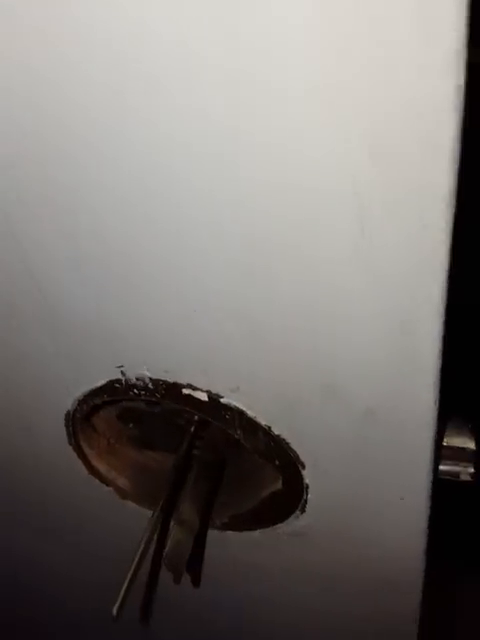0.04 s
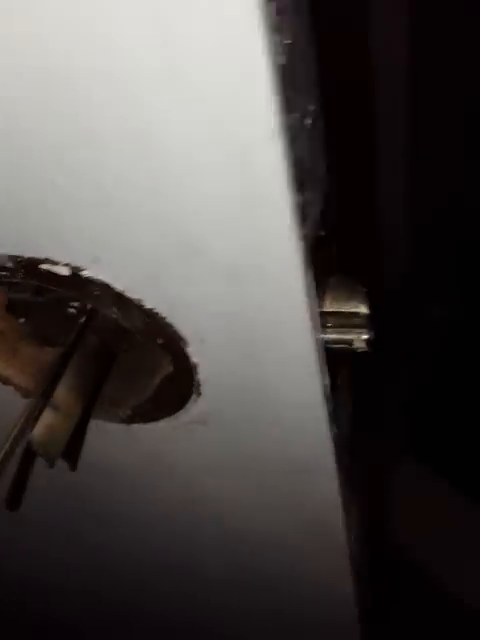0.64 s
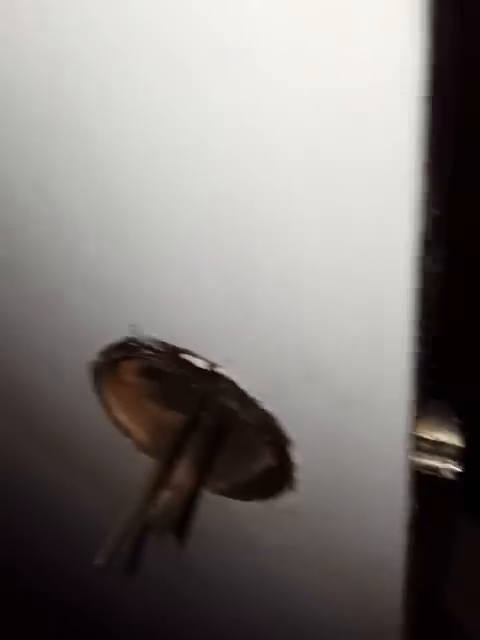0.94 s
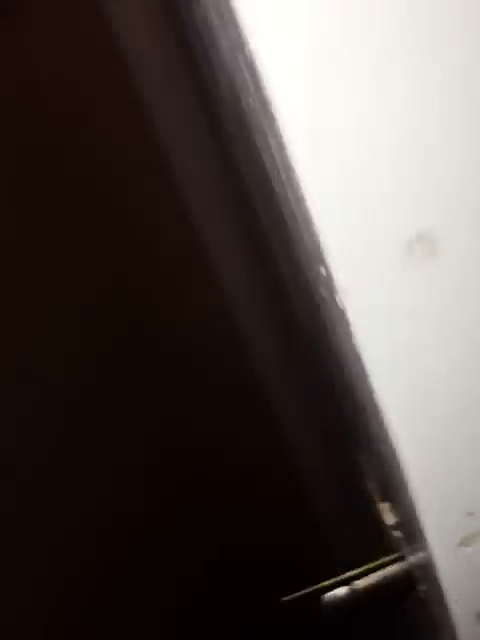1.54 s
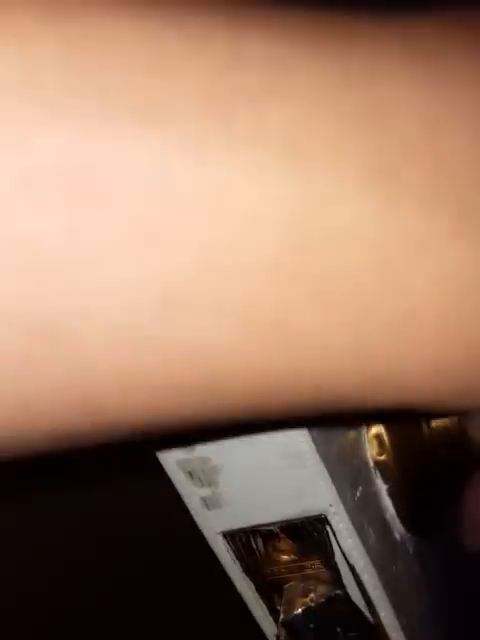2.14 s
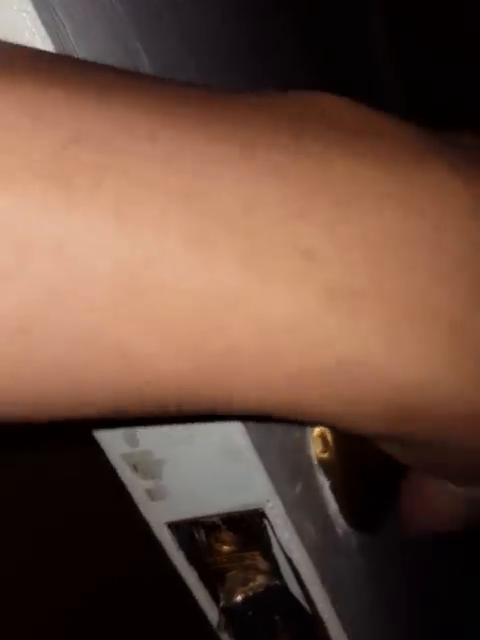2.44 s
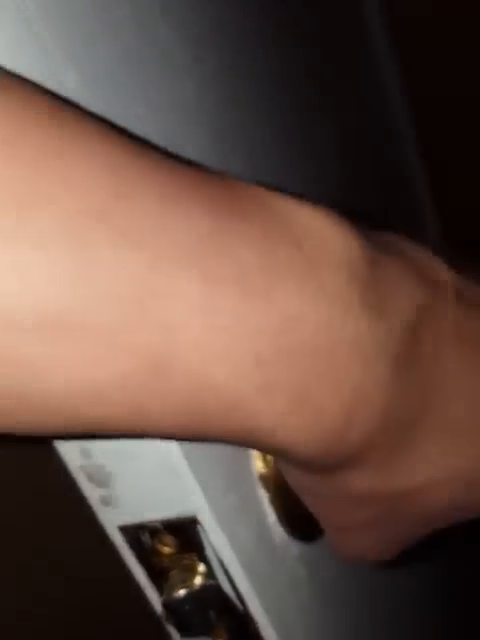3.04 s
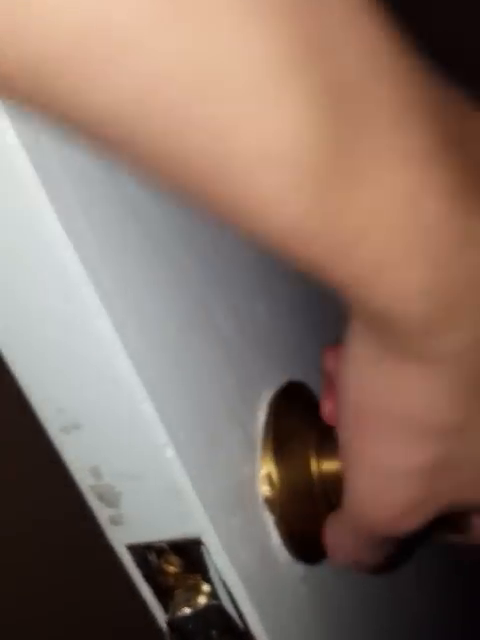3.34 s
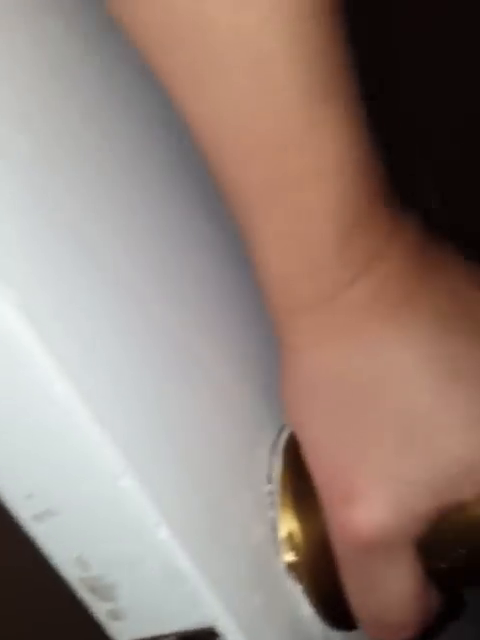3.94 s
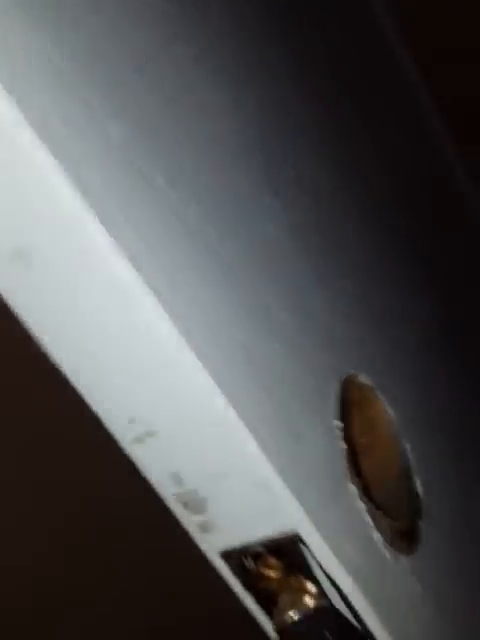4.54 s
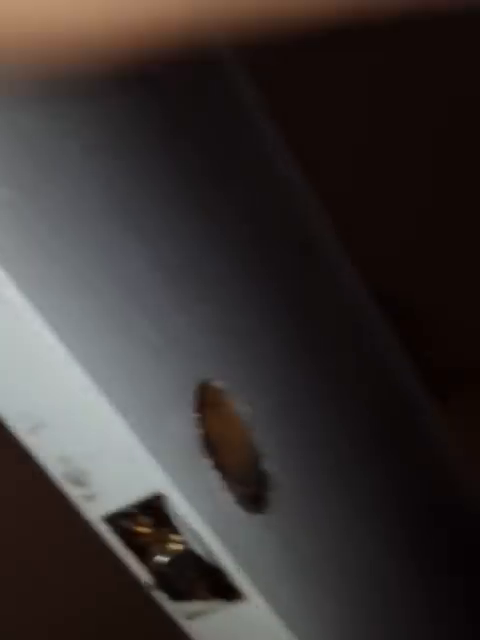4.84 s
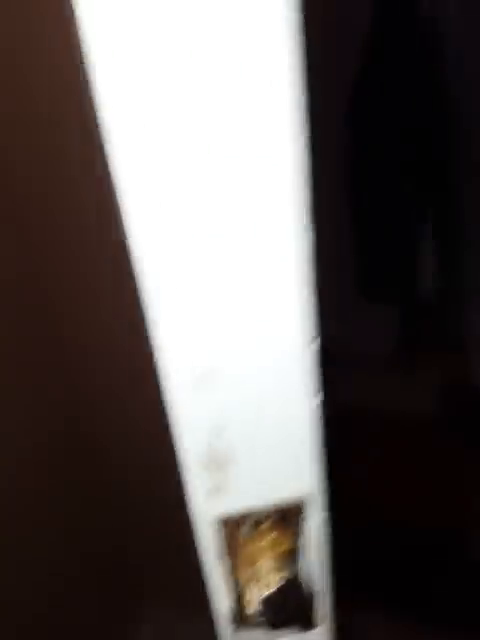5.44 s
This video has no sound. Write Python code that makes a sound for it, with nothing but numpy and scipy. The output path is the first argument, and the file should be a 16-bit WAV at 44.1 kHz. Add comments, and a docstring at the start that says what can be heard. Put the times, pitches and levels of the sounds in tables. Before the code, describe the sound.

An old knob lock is worked out of a hollow wooden door, close to a hand-held microphone in a small room. Light latch clicks build to a hard clack and rattling, ringing metal. Quieter scraping and uneven thuds follow as the knob is twisted. It squeaks, then tears loose with loud clacks and deep door thumps. Brass parts clink and fade over faint room hum, ending with a dull microphone bump.

```python
"""An old knob lock is worked out of a hollow wooden door, close to a hand-held camera in a small room.
First the steel latch tings and its spring pings; lock parts clack, and the door panel booms and lurches.
A hand closes on the knob and twists: the rose scrapes over the wood and gives way in jerks.
The dry spindle squeaks, the knob tears loose and the spindle rasps out through the latch.
Last, the brass shell jingles in the hand and a finger bumps the camera. Faint hiss and hum throughout."""
import sys
import numpy as np
from scipy.fft import rfft, irfft, next_fast_len
from scipy.io import wavfile
from scipy.ndimage import map_coordinates

SR = 44100
rng = np.random.default_rng(int(sys.argv[2]) if len(sys.argv) > 2 else 0)


def to_wav(s):
    """Save 16-bit WAV."""
    ch = np.atleast_2d(s).T  # columns
    pcm = np.round(np.clip(ch, -1, 1) * 32767)  # PCM
    wavfile.write(sys.argv[1], SR, pcm.astype(np.int16))


N = 250929
TIME = np.arange(N) / SR
T = np.arange(int(.6 * SR)) / SR  # time within one event, s
GRAB_S, TEAR_S = 2.2, 3.95  # hand closes on the knob; knob tears loose

# wooden clack spectrum: freq_hz, density_db
CLACK = [(150, -37.5), (380, -17), (520, -2), (620, -3), (740, -5), (850, -3.5), (960, -3.5), (1220, -5),
         (1500, -10.5), (2600, -35.5)]
# metal click spectrum: freq_hz, density_db
CLICK = [(700, -29.5), (1400, -4), (1950, 2), (2350, 1), (2800, -2), (3700, -8), (4300, -12.5),
         (5000, -24.5), (8000, -45)]
# sharp metal tick spectrum: freq_hz, density_db
TICK = [(2500, -25), (4400, 2.5), (5200, 0), (6500, 1), (8200, -1.5), (9700, -12.5), (11500, -6),
        (15500, -11.5)]
# dull panel groan spectrum: freq_hz, density_db
GROAN = [(50, -24), (110, -10.5), (150, -1.5), (200, 4), (260, -9.5), (335, -4.5), (480, -10), (900, -14),
         (2500, -40)]
# likeness of left and right: freq_hz, correlation
ALIKE = [(100, 0.92), (330, 0.92), (600, 0.5), (1200, .1), (3000, 0.053)]


def amp(db):
    """Decibels to gain."""
    return 10 ** (np.asarray(db) / 20)


def unit(x):
    """Scale to rms 1."""
    return x / np.sqrt(np.mean(x ** 2) + 1e-20)


def blow(x):
    """Scale to rms 1 over the first 30 ms."""
    return x / np.sqrt(np.mean(x[..., :int(.03 * SR)] ** 2) + 1e-20)


def fade(t60_s):
    """Free decay, 60 dB in t60_s."""
    return np.exp(-np.log(1000) * T / t60_s)


def swell(rise_s):
    """Exponential rise from 0 to 1."""
    return 1 - np.exp(-T / rise_s)


def along(points, hz):
    """Interpolate (freq_hz, value) points on a log axis."""
    freq_hz, values = np.transpose(points)
    return np.interp(np.log(hz + 1), np.log(freq_hz), values)


def wobble(rate_hz):
    """Smooth random curve with knots at rate_hz."""
    return map_coordinates(rng.standard_normal(int(N * rate_hz / SR) + 4), [TIME * rate_hz])


def add(track, start_s, sound):
    """Mix a sound into the track."""
    start = max(0, round(start_s * SR))
    track[:, start:start + sound.shape[-1]] += sound[..., :N - start]


def noise(spectrum, size, ripple_db=0):
    """Coloured stereo noise, rms 1, alike in the bass; ripple adds random resonances."""
    m = next_fast_len(size)
    hz = np.fft.rfftfreq(m, 1 / SR)
    angle = np.arccos(np.clip(along(ALIKE, hz), -1, 1)) / 2
    ripple = map_coordinates(rng.standard_normal(100), [np.sqrt(hz) / 1.6])
    gain = amp(along(spectrum, hz) + ripple_db * ripple) / (1 + (hz / spectrum[-1][0]) ** 8)
    white = rfft(rng.standard_normal((2, m)))
    mid, side = irfft(white * gain * [np.cos(angle), np.sin(angle)], m)[:, :size]
    return unit(np.array([mid + side, mid - side]))


def ring(modes):
    """Decaying modes at random strengths; high ones reach left and right out of phase."""
    hz, db, t60_s = np.transpose(modes)
    level, phase, skew = rng.standard_normal((3, len(hz)))
    apart = np.arccos(np.clip(along(ALIKE, hz), -1, 1)) * np.sign(skew) / 2
    start = amp(db + 2.5 * level) * np.exp(1j * (np.pi * phase + np.array([apart, -apart])))
    return (start @ np.exp(np.outer(2j * np.pi * hz - np.log(1000) / t60_s, T))).imag


def contact(spectrum, t60_s, room_db, room_t60_s, rise_s):
    """Short crack, then the slower answer of door and room; resonances vary per contact."""
    envelope = np.hypot(fade(t60_s), amp(room_db) * swell(.002) * fade(room_t60_s))
    return blow(noise(spectrum, len(T), ripple_db=3) * envelope * swell(rise_s))


def strokes(rows, rise_share=.7):
    """Gain of hand strokes: each builds to its peak, then falls 20 dB in fall_s."""
    power = 0
    for peak_s, db, fall_s in rows:
        away_s = np.maximum((peak_s - TIME) / rise_share, TIME - peak_s)
        power += amp(db - 20 * away_s / fall_s) ** 2
    return np.sqrt(power)


def room_tone(hiss_db=-63):
    """Steady air noise and an appliance's electric hum."""
    air = [(20, -14.5), (55, -13), (80, -18), (120, -20.5), (200, -23), (700, -25), (1500, -26.5),
           (2500, -31), (4500, -37.5), (16000, -47)]  # freq_hz, density_db
    hum_lines = [(59.2, -62.5), (118.4, -72), (296.1, -77.5)]  # freq_hz, level_db
    hum = sum(amp(db) * np.sqrt(2) * np.sin(2 * np.pi * (hz * TIME + rng.random()))
              for hz, db in hum_lines)
    return amp(hiss_db) * noise(air, N) + hum


def latch(tick_db=-4, click_db=-10, spring_hz=2470):
    """The steel latch snaps and rings thin and high; its shaken spring swells into one lower note."""
    tings = [(.006, -46), (.075, -50), (.1225, -49), (.3, -61.5), (.338, -48), (.491, -62), (.762, -32.5),
             (.769, -26), (.95, -42.5), (.966, -34.5), (1.036, -52.5), (1.107, -37), (1.18, -36),
             (1.261, -38.5), (1.503, -67), (1.534, -59)]  # start_s, level_db
    steel_modes = [(4070, -6.5, 0.11), (4420, -5.5, 0.16), (5360, -9.5, .11), (6555, 10, 0.12),
                   (6660, -2, 0.19), (6960, -13, 0.47), (8530, -10, 0.091), (10800, -5, 0.18),
                   (12800, -12, 0.075), (12730, -8, 0.16)]  # freq_hz, level_db, t60_s
    spring_pings = [(.01, -61), (.142, -51.5), (.339, -63), (.529, -70), (.954, -49.5), (1.261, -59)]  # start_s, level_db
    out = np.zeros((2, N))
    for start_s, db in tings:
        steel = blow(ring(steel_modes) * swell(.0005))
        tick = amp(tick_db) * contact(TICK, t60_s=.012, room_db=-17.5, room_t60_s=.1, rise_s=.0003)
        click = amp(click_db) * contact(CLICK, t60_s=.017, room_db=-11, room_t60_s=.12, rise_s=.0005)
        add(out, start_s, amp(db) * (steel + tick + click))
    for start_s, db in spring_pings:
        note = ring([(spring_hz, 0, .3)])
        add(out, start_s, amp(db) * blow(note * swell(.022)))
    return out


def boom(centre_hz, width_oct=.41, rise_s=.0091, room_db=-9, early_gain=.96):
    """The door panel builds slowly and soon sheds most energy; modes near centre_hz dominate."""
    panel_modes = [(96, -7, 0.66), (129.6, -7.5, 0.15), (148.7, 0.5, 0.15), (176.1, -1.5, 0.24),
                   (208.1, -0.5, .31), (256.2, -5.5, .3), (287.6, -8.5, 0.22), (340, -1.5, 0.32),
                   (388.4, -3.5, 0.16), (425, -2.5, .28), (467.5, -9, 0.43), (531, -6.5, 0.41),
                   (551, -7, 0.41), (744, -4, 0.43), (916, -10.5, 0.28), (933, -9, 0.29)]  # freq_hz, level_db, t60_s
    excited = [(hz, db - 10 * np.log10(1 + (np.log2(hz / centre_hz) / width_oct * 2) ** 2), t60_s)
               for hz, db, t60_s in panel_modes]
    panel = blow(ring(excited))
    room = amp(room_db) * blow(noise(GROAN, len(T)) * fade(.38))
    return blow((panel + room) * swell(rise_s) * (1 + early_gain * fade(.14)))


def metal(start_s, click_db, tick_db, case_db=-5, muffle_db=-10):
    """Metal on metal: a click that rings the lock case, and a tick, dulled while the knob is gripped."""
    case_modes = [(1714, -8, 0.12), (1998, 4.5, 0.035), (2254, -2, 0.092), (2296, 1.5, 0.052),
                  (2522, -4.5, 0.21), (2758, -3, .14), (3385, -10, 0.068), (4230, -7.5, 0.059)]  # freq_hz, level_db, t60_s
    muffled = [(hz, db + muffle_db * np.clip(np.log2(hz / 6500), 0, 1)) for hz, db in TICK]
    spectrum = muffled if GRAB_S < start_s < TEAR_S else TICK
    click = contact(CLICK, t60_s=.026, room_db=-12, room_t60_s=.22, rise_s=.0011)
    case = amp(case_db) * blow(ring(case_modes) * swell(.0028))
    tick = contact(spectrum, t60_s=.016, room_db=-10.5, room_t60_s=.19, rise_s=.00055)
    return amp(click_db) * blow(click + case) + amp(tick_db) * tick


def knocks(free_door_hz=370, held_door_hz=247.4):
    """Lock parts strike in their bore; harder hits click and tick more, and the held door booms lower."""
    hits = [(0.1224, -53, -56.5, -8.5), (.217, -55.5, -45.5, -4.5), (.758, -24.5, -22, -8),
            (.77, -25, -19.5, -18), (.811, -11.5, -15.5, -14), (.926, -26, -26.5, -32),
            (.949, -31, -25, -12), (1.106, -25, -33.5, -19), (1.176, -32.5, -39.5, -12),
            (1.221, -47.5, -70, -16), (1.258, -32, -42.5, -17.5), (1.534, -48, -58, -14),
            (1.562, -47, -50, -22), (1.799, -51.5, -55, 0), (2.249, -46.5, -44.5, -21),
            (2.27, -40, -37, -19), (2.296, -40.5, -30.5, -15), (2.59, -46, -37.5, -16),
            (3.372, -40, -37.5, -20), (3.457, -26, -47.5, -25), (3.967, -25.5, -16, -2.5),
            (4.034, -30, -34.5, -27.5), (4.249, -24, -19, -5), (4.292, -20.5, -22.5, -2.5),
            (4.318, -26, -17.5, -12.5), (4.762, -52.5, -53, -20)]  # start_s, clack_db, boom_db, hardness_db
    out = np.zeros((2, N))
    for start_s, clack_db, boom_db, hardness_db in hits:
        panel = amp(boom_db) * boom(free_door_hz if start_s < GRAB_S else held_door_hz)
        clack = amp(clack_db) * contact(CLACK, t60_s=.025, room_db=-8, room_t60_s=.24, rise_s=.0004)
        parts = metal(start_s, click_db=clack_db + 1 + .36 * hardness_db, tick_db=clack_db + hardness_db)
        add(out, start_s, panel + clack + parts)
    return out


def handling():
    """The hand shifts with a dull rustle; fingers bump the camera by its right microphone."""
    rustles = [(.22, -51.5, 0.36), (2.04, -53, .14), (2.48, -55.5, 0.19), (4.2, -52, .5), (4.58, -45, 0.18),
               (4.975, -43, 0.11), (5.16, -45.5, 0.14)]  # peak_s, level_db, fall_s
    bumps = [(0.7, -42.5), (5.61, -28)]  # start_s, level_db
    out = strokes(rustles) * unit(noise(GROAN, N) * amp(2.5 * wobble(20)))
    push = np.diff(np.sin(2 * np.pi * 215 * T) * fade(.028) * swell(.00098))
    bump = blow(np.array([[-.1], [1]]) * push)
    for start_s, db in bumps:
        add(out, start_s, amp(db) * bump)
    return out


def lurches():
    """Hard tugs rock the door on its hinges: a deep push, then a lingering rumble."""
    tugs = [(.81, -38), (1.11, -46.5), (3.968, -23.5), (4.248, -28), (4.29, -27)]  # start_s, level_db
    rumble = [(25, -21.5), (50, -14.5), (75, -13), (115, -3.5), (150, -1), (220, -18)]  # freq_hz, density_db
    out = np.zeros((2, N))
    for start_s, db in tugs:
        push = contact(rumble, t60_s=.22, room_db=-16.5, room_t60_s=.73, rise_s=.0017)
        add(out, start_s, amp(db) * push)
    return out


def rubbing(groan_db=5, grain_db=2, catch_db=4.5, lump_db=3):
    """The palm hisses on brass; each twist drags the rose over the wood and makes the panel groan."""
    palm_slides = [(2.19, -69, .15), (3.283, -52, .05), (3.4, -61.5, .7), (3.58, -52, .06)]  # peak_s, level_db, fall_s
    twists = [(2.86, -48.5, 0.33), (3.01, -51, 0.093), (3.25, -44, 0.32), (3.42, -47, 0.35),
              (3.66, -52, 0.55), (3.86, -50.5, 0.4)]  # peak_s, level_db, fall_s
    skin_on_brass = [(2000, -20), (4000, -1), (6000, -3), (8200, 0.5), (9500, -13), (15500, -4)]  # freq_hz, density_db
    rose_on_wood = [(300, -15), (600, -3.5), (1300, -0.5), (2600, -5), (5000, -19.5), (9000, -20.5)]  # freq_hz, density_db
    scrape = unit(noise(rose_on_wood, N) * amp(grain_db * wobble(260) + catch_db * wobble(34)))
    groan = amp(groan_db) * unit(noise(GROAN, N) * amp(lump_db * wobble(24.76)))
    palm = strokes(palm_slides) * noise(skin_on_brass, N)
    return palm + strokes(twists) * (scrape + groan)


def slips(door_hz=197, wood_db=-2, tick_db=-11):
    """Each jerk of the rose thuds softly in the panel and scrapes metal over wood."""
    jerks = [(2.68, -42, -53.5), (2.854, -43, -35.5), (2.924, -36, -55), (2.96, -51, -48.5),
             (3.095, -30.5, -57), (3.151, -34.5, -44.5), (3.228, -39.5, -47.5), (3.277, -38.5, -45.5),
             (3.297, -31, -48.5), (3.569, -40, -52.5), (3.614, -36, -63), (3.707, -36, -52.5),
             (3.835, -46.5, -49.5), (3.894, -42.5, -48)]  # start_s, thud_db, scrape_db
    out = np.zeros((2, N))
    for start_s, thud_db, scrape_db in jerks:
        wood = contact(CLACK, t60_s=.034, room_db=-2.5, room_t60_s=.25, rise_s=.001)
        thud = boom(door_hz, width_oct=.26, rise_s=.008, room_db=-11, early_gain=1.6)
        rose = metal(start_s, scrape_db, scrape_db + tick_db)
        add(out, start_s, amp(thud_db) * thud + amp(scrape_db + wood_db) * wood + rose)
    return out


def squeak(start_s=3.913, hold_s=.018, pitch_hz=2410, level_db=-41, jitter=.0034):
    """The dry spindle sticks and slips at one of its modes; odd overtones are strong, high ones brief."""
    phase = 2 * np.pi * np.cumsum(pitch_hz * (1 + jitter * wobble(300)[:len(T)])) / SR
    out = np.zeros((2, N))
    for k, harmonic_db in enumerate([0, -19, -7, -18, -27], 1):
        decay = np.exp(-np.log(1000) * np.maximum(T - hold_s, 0) * np.sqrt(k) / .15)
        tone = np.sqrt(2) * np.sin(k * phase + rng.uniform(0, np.pi, (2, 1)))
        add(out, start_s, amp(level_db + harmonic_db) * swell(.0026) * decay * tone)
    return out


def pulling(start_s=4.232, rise_s=.012, drag_s=.06, t60_s=.15, start_db=-23, growth_db_per_s=130):
    """The square spindle chatters out through the latch, growing louder until it comes free."""
    rasp = noise(CLICK, N) + amp(-6) * noise(TICK, N) + amp(-7) * noise(CLACK, N)
    chatter = unit(rasp * amp(4 * wobble(210)))
    age_s = np.maximum(TIME - start_s, 0)
    attack = 1 - np.exp(-age_s / rise_s)
    growth = amp(start_db + growth_db_per_s * np.minimum(age_s, drag_s))
    release = np.exp(-np.log(1000) * np.maximum(age_s - drag_s, 0) / t60_s)
    return attack * growth * release * chatter


def knob(click_db=-9, tick_db=-19):
    """The loose rose hits the brass shell: a hard contact, then a short bell-like ring."""
    clinks = [(4.253, -29.5), (4.287, -24.5), (4.408, -32), (4.442, -39), (4.48, -37.5), (4.492, -25.5),
              (4.988, -33), (5.083, -30.5), (5.136, -44.5), (5.148, -41.5), (5.246, -49.5), (5.288, -59.5),
              (5.366, -59.5), (5.387, -53.5)]  # start_s, level_db
    brass_modes = [(1780, -1, 0.035), (2048, 6, 0.055), (2184, 2.5, .16), (2274, -3, 0.16), (2645, -3, .21),
                   (3050, -12, .13), (3330, -16.5, 0.042), (3704, -12.5, 0.12), (4580, -6, 0.11),
                   (5600, -17, .13), (5970, -7.5, .1), (6640, -18, 0.22), (11900, -22, 0.083)]  # freq_hz, level_db, t60_s
    out = np.zeros((2, N))
    for start_s, db in clinks:
        shell = blow(ring(brass_modes) * swell(.00069) * (1 + 2 * fade(.012)))
        click = amp(click_db) * contact(CLICK, t60_s=.0069, room_db=-24, room_t60_s=.29, rise_s=.0013)
        tick = amp(tick_db) * contact(TICK, t60_s=.0087, room_db=-17, room_t60_s=.25, rise_s=.00057)
        add(out, start_s, amp(db) * (shell + click + tick))
    return out


def scene():
    """All sources, in stereo."""
    return (room_tone() + latch() + knocks() + handling() + lurches()
            + rubbing() + slips() + squeak() + pulling() + knob())


def record(dry, top_hz=16200):
    """Two microphones of slightly unequal colour, clipped at full scale, then band-limited."""
    balance = [(100, 2.5), (400, 1.5), (1000, 1.5), (2300, -2.5), (4500, 0.5), (8000, 0.5), (14000, 2)]  # freq_hz, left_minus_right_db
    m = next_fast_len(N + SR // 2)
    hz = np.fft.rfftfreq(m, 1 / SR)
    lean_db = along(balance, hz) / 2
    coloured = irfft(rfft(dry, m) * amp([lean_db, -lean_db]), m)
    clipped = np.clip(coloured, -1, 1)
    return irfft(rfft(clipped) * (hz < top_hz), m)[:, :N]


dry = scene()
out = record(dry)
to_wav(out)
```